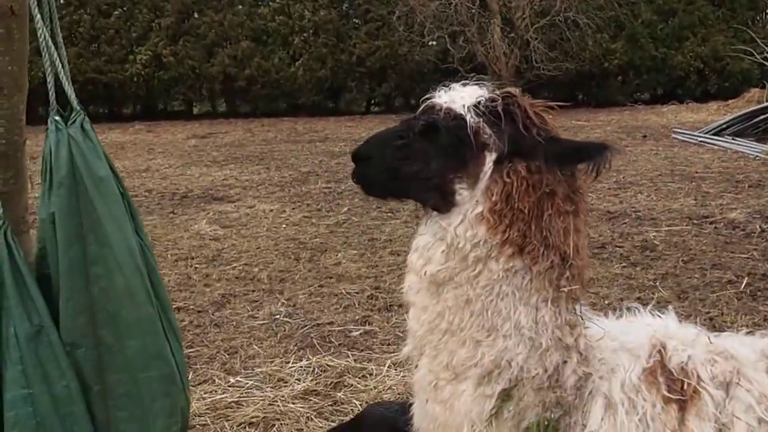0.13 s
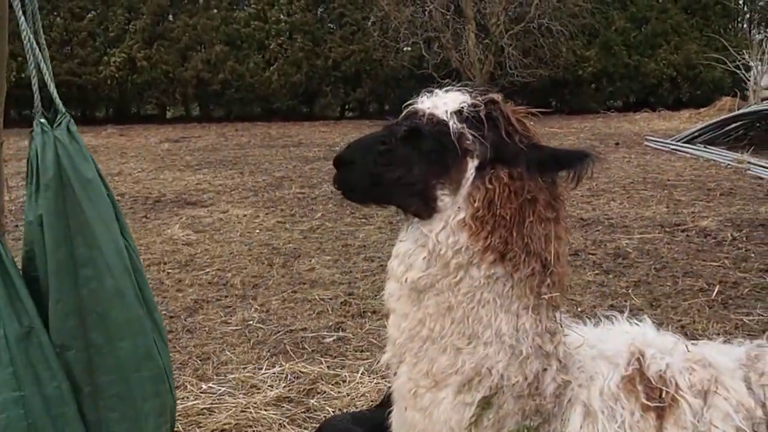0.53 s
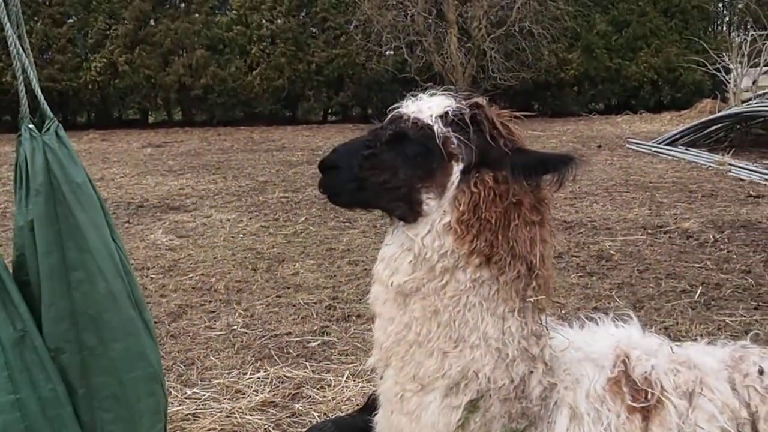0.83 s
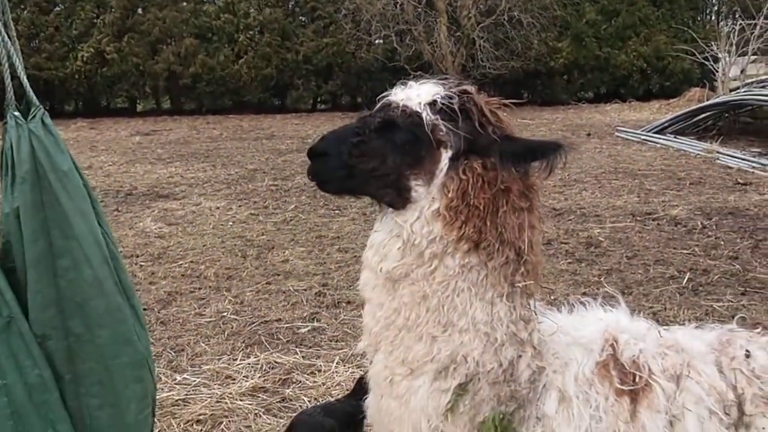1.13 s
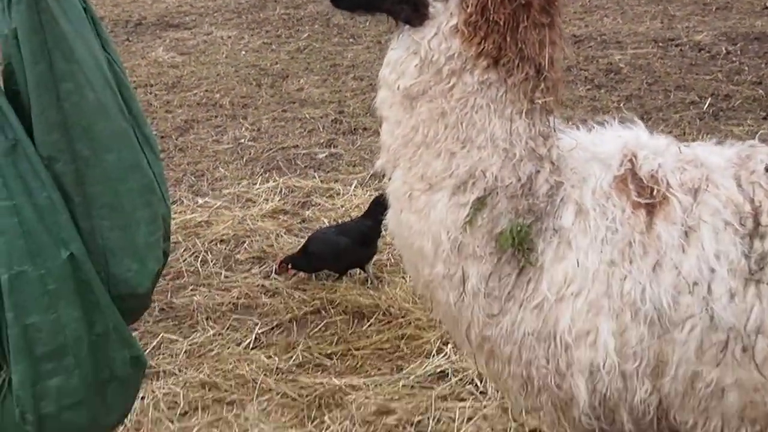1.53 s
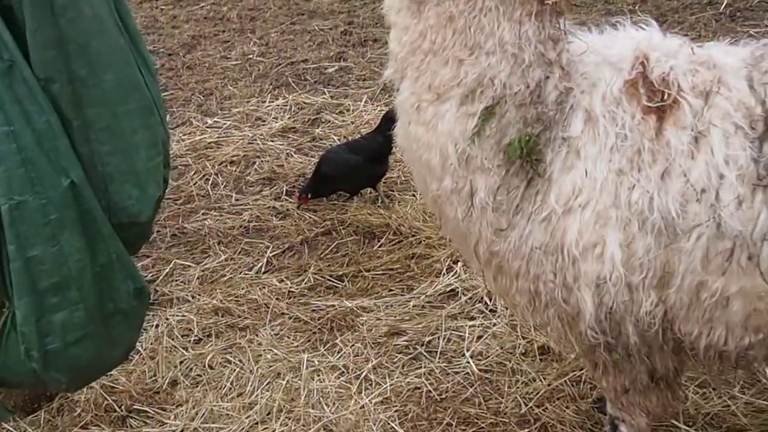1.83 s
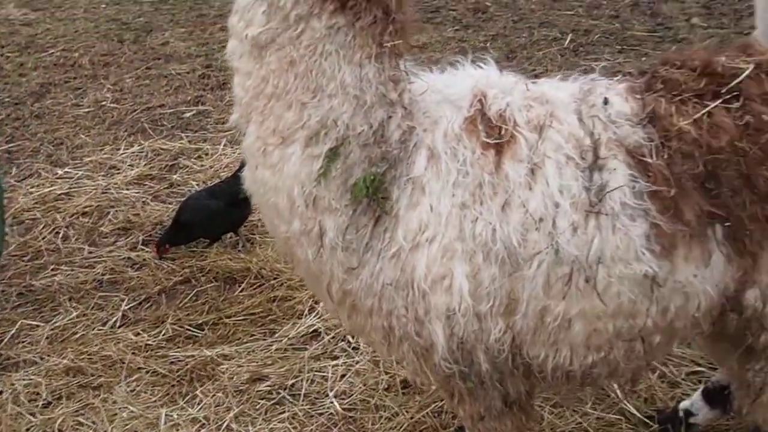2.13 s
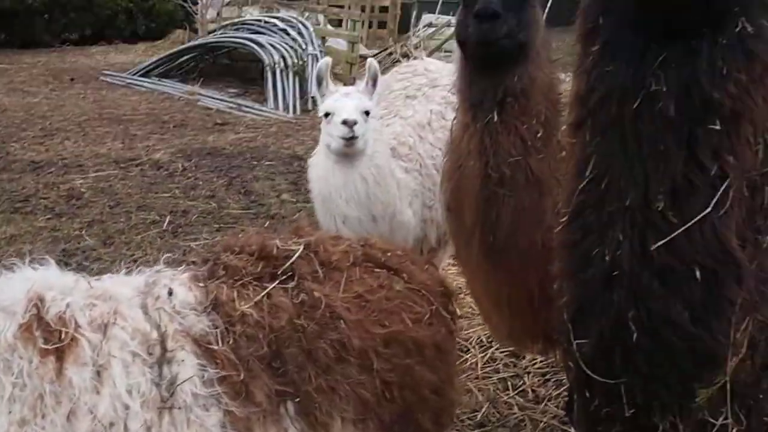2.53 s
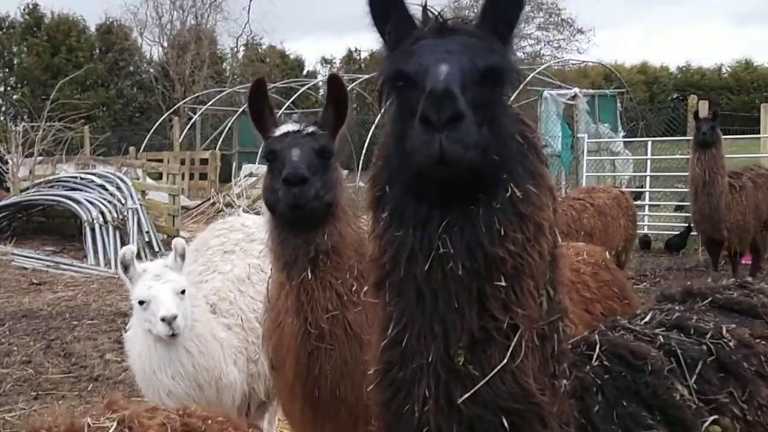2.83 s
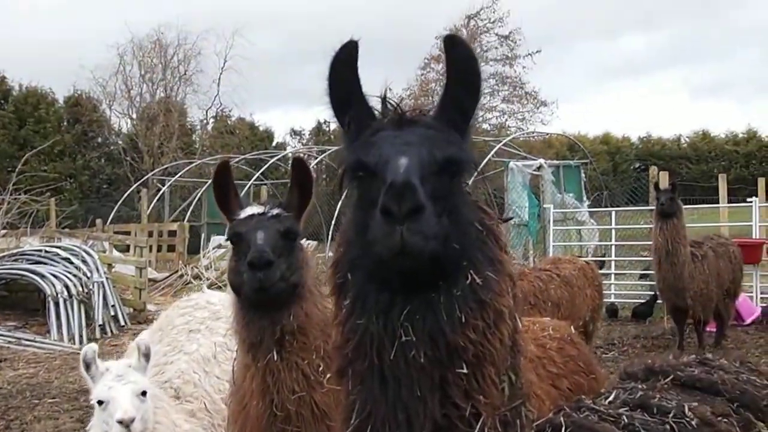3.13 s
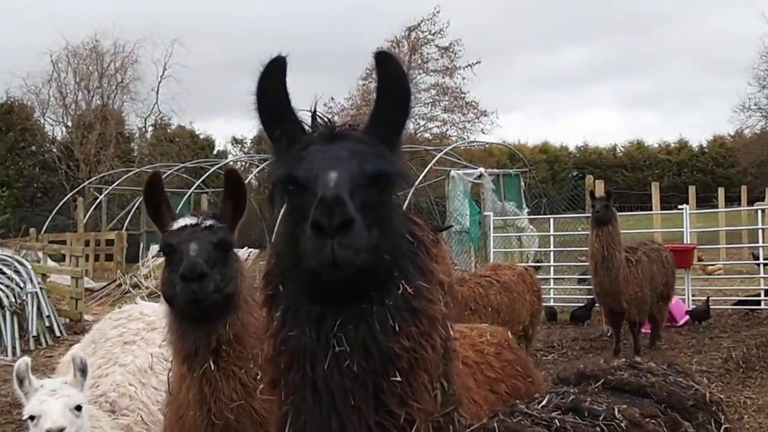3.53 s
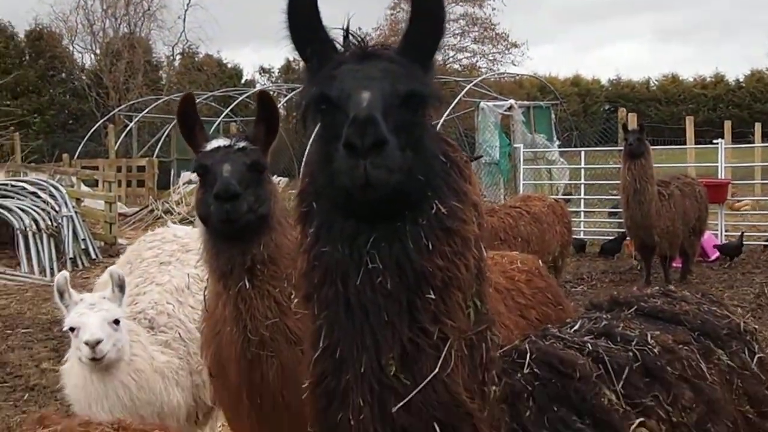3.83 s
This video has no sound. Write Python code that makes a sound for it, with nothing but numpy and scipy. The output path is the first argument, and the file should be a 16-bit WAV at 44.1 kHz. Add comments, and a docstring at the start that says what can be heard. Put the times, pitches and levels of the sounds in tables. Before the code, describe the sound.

One hoarse rooster crow rings across a paddock from about one to three seconds, cracking at its end. Low wind buffets hit the microphone before and during it, then a close click and soft clucks.

```python
"""In a farmyard a rooster crows once: two short notes, a third, and a long sinking one.
Hoarse pulses and a clear tone ring through throat resonances and echo around the yard.
Shaped noise makes the wind that buffets the microphone, and short swinging tones make its thumps.
Sliding tones make a small bird and hens, faint behind; short ringing snaps make clicks close by."""
import sys
import numpy as np
from scipy import signal
from scipy.fft import rfft, irfft
from scipy.io import wavfile
from scipy.ndimage import uniform_filter1d

SR = 44100
rng = np.random.default_rng(int(sys.argv[2]) if len(sys.argv) > 2 else 0)


def unload_audio(sound):
    """Save the sound as a 16-bit wav file, at the path given as the first command line argument."""
    columns = np.transpose(np.atleast_2d(sound))
    # keep every value between -1 and 1, then stretch to whole-number steps
    steps = np.round(np.clip(columns, -1, 1) * 32767)
    wavfile.write(sys.argv[1], SR, steps.astype(np.int16))


N = 176400
T = np.arange(N) / SR


def amp(db):
    """Turns decibels into gain."""
    return 10 ** (np.asarray(db) / 20)


def unit(x):
    """Scales a sound to an rms level of 1."""
    return x / np.sqrt(np.mean(x ** 2) + 1e-20)


def curve(points):
    """Joins (seconds, value) points with straight lines over the whole scene."""
    return np.interp(T, *np.transpose(points))


def read(points, hz):
    """Reads (Hz, value) points along a logarithmic frequency axis."""
    point_hz, value = np.transpose(points)
    return np.interp(np.log(hz + 1), np.log(point_hz), value)


def add(mix, start_s, sound):
    """Mixes a sound in at a given time."""
    part = mix[max(round(start_s * SR), 0):][:len(sound)]
    part += sound[:len(part)]


def noise(spectrum):
    """Random noise coloured by a spectrum, at an rms level of 1."""
    gain = amp(read(spectrum, np.fft.rfftfreq(N, 1 / SR)))
    return unit(irfft(rfft(rng.standard_normal(N)) * gain, N))


def wander(rate_hz):
    """Random drift, mostly slower than the given rate, at an rms level of 1."""
    slowing = 1 + (np.fft.rfftfreq(N, 1 / SR) / rate_hz) ** 4
    return unit(irfft(rfft(rng.standard_normal(N)) / slowing, N))


def steady(x, size):
    """Evens out the running level to 1; size is the averaging length in samples."""
    power = uniform_filter1d(uniform_filter1d(x ** 2, size), size)
    return x / np.sqrt(abs(power) + 1e-12)


def glides(rows, arch=0, rough=0):
    """Short soft-edged tones that slide in pitch, optionally arched or rough."""
    out = np.zeros(N)
    for start_s, length_s, hz, glide, db in rows:
        u = np.linspace(-.5, .5, int(length_s * SR))
        pitch_hz = hz * (1 + glide * u - arch * u * u + rough * wander(292)[:len(u)])
        tone = np.sin(2 * np.pi * np.cumsum(pitch_hz) / SR)
        add(out, start_s, amp(db) * np.cos(np.pi * u) * tone)
    return out


# Colour of the faint open-air hiss. Each row: frequency in Hz, relative level in dB.
HISS_SPECTRUM = [(100, -3.5), (300, 0.5), (750, -1), (3000, -20), (7500, -27.5), (10500, -38),
                 (15500, -31.5)]


def open_air(level_db=-41):
    """Distant hiss of the fields: steady noise, strongest in the low range."""
    return amp(level_db) * noise(HISS_SPECTRUM)


# Wind buffets. Each row: centre in seconds, time to fade to about a third in seconds, level in dB.
BUFFETS = [(0.563, 0.034, -21), (1.309, 0.047, -22.5), (1.395, 0.03, -22.5), (1.524, 0.085, -24.5),
           (2.393, 0.02, -17), (2.53, 0.038, -15), (2.652, 0.081, -14.5), (2.875, 0.057, -14.5),
           (3.014, 0.067, -15.5), (3.17, 0.017, -18)]
# Colour of gentle wind. Each row: frequency in Hz, relative level in dB.
GENTLE_WIND = [(15, -6.5), (75, 3.5), (150, -6.5), (400, -32.5), (3000, -70)]
# Colour of strong wind. Each row: frequency in Hz, relative level in dB.
STRONG_WIND = [(15, -32), (100, 2), (270, -4), (600, -22), (3000, -67)]
# Rumble under the buffets, before its random drift. Each row: time in seconds, level in dB.
RUMBLE_LEVEL = [(.9, -36), (1.3, -25.5), (1.8, -39.5), (3.2, -28.5), (3.55, -32)]


def wind(hard_db=-12):
    """Turbulent air on the microphone makes noise; the stronger buffets reach higher."""
    force_squared = sum(amp(db) ** 2 * np.exp(-2 * ((T - s) / half) ** 2) for s, half, db in BUFFETS)
    force = np.sqrt(force_squared)
    hard = np.clip(force / amp(hard_db), 0, 1) ** 2  # share of the strong colour
    blend = np.sqrt(1 - hard) * noise(GENTLE_WIND) + np.sqrt(hard) * noise(STRONG_WIND)
    buffets = force * steady(blend, size=900)
    rumble_db = curve(RUMBLE_LEVEL) + 4.3 * wander(5.6)
    return buffets + amp(rumble_db) * steady(noise(GENTLE_WIND), size=3000)


# Wind thumps. Each row: centre in seconds, peak level in dB, approximate frequency in Hz.
WIND_THUMPS = [(0.468, -7, 90.1), (.55, -16, 150.2), (.762, -20.5, 168), (0.805, -18, 164.6),
               (.885, -19, 150.5), (1.058, -23, 170), (2.392, -11, 125), (2.584, -5, 174.7),
               (2.672, -8, 200), (2.694, -7.5, 329.2), (2.73, -5, 250), (2.754, -10, 261),
               (2.897, -7, 237.9), (3.065, -9.5, 229.3)]
THUMP_CYCLES, THUMP_SKEW = .7, .7  # spread in swings, steepness of the fronts in radians


def thumps():
    """Single eddies slap the microphone: a few uneven, steep-fronted swings of pressure each."""
    out = np.zeros(N)
    uneven_s = np.cumsum(np.exp(.25 * wander(90))) / SR  # a clock that runs unevenly
    for centre_s, db, hz in WIND_THUMPS:
        swell = np.exp(1 - np.hypot((T - centre_s) * hz / THUMP_CYCLES, 1))
        phase = 2 * np.pi * (hz * uneven_s + rng.random())
        out += amp(db) * swell * np.sin(phase + THUMP_SKEW * swell * np.sin(phase))
    return out


# Throat resonances. Each row: frequency in Hz before neck and wobble, width in Hz,
# then the level in dB in the opening note, in full cry and in the closing note.
RESONANCES = [(659.4, 80, -4.5, -0.5, 3), (1113, 320, -8, -7.5, -5), (1631, 220, 0, -2.5, 0),
              (2089, 278, -6.5, -2.5, -4), (3086, 184, -29.5, -9, -18.5), (4170, 600, -23, -45, -15),
              (5170, 365, -18, -27, -11.5), (6196, 470, -27, -31.5, -14), (7270, 610, -50, -30.5, -30.5),
              (8145, 300, -32, -32, -19.5), (8980, 160, -34, -35, -27), (12000, 4600, -43.5, -42.5, -35)]
# Passage from opening note (0) through full cry (1) to closing note (2).
# Each row: time in seconds, stage as a plain number.
CRY_STAGE = [(1.28, 0.082), (1.37, 0.96), (1.95, 1.03), (2.45, 1.81)]
# The resonances sink as the neck relaxes. Each row: time in seconds, factor on the frequency.
NECK_FACTOR = [(1.15, 0.96), (1.45, 0.98), (1.88, 0.992), (2.1, 0.944), (3.2, 0.92)]
NECK_TOP_HZ, WOBBLE = 3500, .016  # only lower resonances follow the neck; wobble as a share
SWELL_S, SWELL_LENGTH_S, SWELL_DB = 2.478, 0.1, 6.5  # the ring near 5 kHz swells in the long note


def throat(x):
    """Steep throat resonances that wobble, sink and change weight along the crow."""
    neck, stage, out = curve(NECK_FACTOR), curve(CRY_STAGE), 0
    swell_db = SWELL_DB * np.exp(-((T - SWELL_S) / SWELL_LENGTH_S) ** 2)
    for k, (hz, width_hz, *stages_db) in enumerate(RESONANCES):
        factor = (neck if hz < NECK_TOP_HZ else 1) + WOBBLE * wander(10)
        spin = np.exp(2j * np.pi * hz * np.cumsum(factor) / SR)
        # shift the resonance down to 0 Hz, smooth three times, shift back up
        r = np.exp(-np.pi * width_hz * 2 / SR)
        ring = signal.lfilter([(1 - r) ** 3], np.poly([r, r, r]), x / spin)
        level_db = np.interp(stage, np.arange(len(stages_db)), stages_db)
        level_db = level_db + swell_db * (4700 < hz < 5800)
        out = out + amp(level_db) * (spin * ring * (-1) ** k).real
    return out


# Pitch of the crow, before its random unsteadiness. Each row: time in seconds, pitch in Hz.
CROW_PITCH = [(1.08, 543.6), (1.135, 652), (1.165, 779), (1.22, 620), (1.38, 754.3), (1.415, 855.6),
              (1.45, 839.4), (1.505, 692.6), (1.65, 821.7), (1.8, 859.6), (1.9, 793.6), (2.15, 771.3),
              (2.79, 777), (3.14, 705), (3.22, 637)]
# Hoarse voice, before the shared flutter. Each row: time in seconds, level in dB.
HOARSE_LEVEL = [(1.06, -101), (1.08, -32), (1.13, -25), (1.19, -25), (1.225, -30.5), (1.26, -44),
                (1.372, -79), (1.39, -22.5), (1.455, -32), (1.495, -26.5), (1.54, -33), (1.6, -25.5),
                (1.82, -23), (1.89, -32), (1.98, -25), (2.24, -23.5), (2.52, -31), (2.76, -41),
                (2.9, -33.5), (3.16, -38.5), (3.28, -43)]
# Clear voice, before the shared flutter. Each row: time in seconds, level in dB.
CLEAR_LEVEL = [(1.08, -52), (1.135, -32), (1.165, -20), (1.23, -72), (1.38, -55), (1.41, -23),
               (1.47, -16.5), (1.51, -51), (1.595, -27), (1.625, -20), (1.67, -34.5), (1.8, -35),
               (1.88, -54), (2.24, -36.5), (2.7, -60), (2.8, -32.5), (2.88, -43), (3.04, -39.5),
               (3.13, -28.5), (3.24, -53)]
# Clear tone before the throat. Each entry: level in dB of one harmonic, from the fundamental up;
# ten higher ones stay at the last level.
CLEAR_HARMONICS = [-9, -0.5, -4.5, -1, -4.5]
# timing spread of the pulses and of the clear tone, strength spread of the pulses, breath level
JITTER, CLEAR_JITTER, SHIMMER, AIR = .07, .005, .4, .45
# rasp: timing spread, strength spread, share of the hoarse power, weakening of every other beat
RASP_JITTER, RASP_SHIMMER, RASP_SHARE, RASP_HALVES = .028, .22, .55, .45
# a brief throb of the clear tone at a third of its pitch
THIRDS_S, THIRDS_LENGTH_S, THIRDS_DEPTH = 1.425, 0.024, 0.89
FLUTTER_DB = 1.7  # typical unsteadiness of loudness


def rooster():
    """Chaotic pulses, a rasp on every third cycle and a clear tone share one pitch and one throat."""
    hz = curve(CROW_PITCH)

    ragged = np.cumsum(hz * (1 + JITTER * wander(220))) / SR
    pulses = np.diff(np.floor(ragged), prepend=0) * np.exp(SHIMMER * wander(200))
    puffs = np.exp(-(ragged % 1) / 2.2) * rng.standard_normal(N)  # breath fades within each cycle
    chaos = unit(unit(pulses - pulses.mean()) + AIR * unit(puffs))

    beats = np.floor(np.cumsum(hz / 3 * (1 + RASP_JITTER * wander(45))) / SR)
    rasp = np.diff(beats, prepend=0) * np.exp(RASP_SHIMMER * wander(91))
    rasp = rasp * (1 - RASP_HALVES * (beats % 2))
    hoarse = np.sqrt(1 - RASP_SHARE) * chaos + np.sqrt(RASP_SHARE) * unit(rasp)

    drift = CLEAR_JITTER * np.maximum(curve(CRY_STAGE), 1) * wander(73.2)
    turns = np.cumsum(hz * (1 + drift)) / SR
    levels_db = CLEAR_HARMONICS + CLEAR_HARMONICS[-1:] * 10
    clear = sum(amp(db) * np.cos(2 * np.pi * k * turns) for k, db in enumerate(levels_db, 1))
    throb = THIRDS_DEPTH * np.exp(-((T - THIRDS_S) / THIRDS_LENGTH_S) ** 2)
    clear = clear * (1 + throb * np.cos(2 * np.pi * turns / 3))

    low_cut = signal.butter(4, 500, "high", fs=SR, output="sos")
    hoarse, clear = signal.sosfilt(low_cut, throat(np.array([hoarse, clear])))
    voice = steady(hoarse, size=900) * amp(curve(HOARSE_LEVEL))
    voice = voice + steady(clear, size=900) * amp(curve(CLEAR_LEVEL))
    fade_out = np.clip((HOARSE_LEVEL[-1][0] - T) / 0.053, 0, 1)
    return voice * amp(FLUTTER_DB * wander(29)) * (T > HOARSE_LEVEL[0][0]) * fade_out


# First reflections from the ground and the pens. Each row: delay in seconds, gain as a factor.
FIRST_REFLECTIONS = [(.0047, 0.11), (0.0102, 0.4), (.023, .2)]


def reflected(x):
    """Adds the first reflections: delayed, weaker copies of the sound."""
    out = x.copy()
    for delay_s, gain in FIRST_REFLECTIONS:
        add(out, delay_s, gain * x)
    return out


# How long the echo rings. Each row: frequency in Hz, time to fade by 60 dB in seconds.
ECHO_FADE = [(4000, .85), (12000, 0.32)]


def yard_echo(x, wet_db=-12, rise_s=0.021):
    """Scattered reflections from sheds and hedges: a noise tail whose treble fades sooner."""
    hz, t, cells = signal.stft(rng.standard_normal(SR), SR, nperseg=256)
    fade_db = -60 * t / read(ECHO_FADE, hz)[:, None]
    tail = signal.istft(cells * amp(fade_db), SR)[1]
    tail = tail * np.minimum(np.arange(len(tail)) / SR / rise_s, 1) ** 2
    return amp(wet_db) * signal.fftconvolve(x, tail / np.linalg.norm(tail))[:N]


# The bird's one whistle, a single row: start in seconds, length in seconds, pitch in Hz,
# glide as a share of the pitch, level in dB.
WHISTLE = (2.151, .165, 3975, .07, -46)


def small_bird():
    """A faint whistle whose pitch arches up and over."""
    return glides([WHISTLE], arch=0.4)


# Clicks. Each row: start in seconds, peak level in dB.
CLICK_TIMES = [(2.5395, -23.5), (3.3538, -12.5)]
# Tones inside a click. Each row: frequency in Hz, relative level in dB,
# time to fade by 60 dB in seconds.
CLICK_TONES = [(3513, 3, 0.0044), (5980, 1, 0.0027), (8900, -15, 0.0063)]


def clicks(rise_s=0.00047):
    """Tiny dry snaps close by: fast-fading high tones with a burst of noise."""
    out, t = np.zeros(N), np.arange(0, .02, 1 / SR)
    ring = sum(amp(db - 60 * t / t60) * np.sin(2 * np.pi * hz * t) for hz, db, t60 in CLICK_TONES)
    burst = 0.56 * np.exp(-t / 0.0012) * rng.standard_normal(len(t))
    snap = (ring + burst) * np.minimum(t / rise_s, 1)
    for start_s, db in CLICK_TIMES:
        add(out, start_s, amp(db) * snap / abs(snap).max())
    return out


# Squeals in the crow. Each row: start in seconds, length in seconds, middle pitch in Hz,
# glide as a share of the pitch, level in dB.
CROW_SQUEALS = [(3.085, .1, 2750, -.33, -41), (3.16, .07, 3470, -.1, -46)]


def squeals():
    """The crow cracks into rough, falling squeals."""
    return glides(CROW_SQUEALS, rough=0.032)


# Hen clucks. Each row: start in seconds, length in seconds, middle pitch in Hz,
# glide as a share of the pitch, level in dB.
HEN_CLUCKS = [(3.547, 0.034, 258, 0.13, -29.5), (3.683, 0.057, 540, -0.24, -34.5)]


def hens():
    """Soft clucks: very short low tones that slide up or down."""
    return glides(HEN_CLUCKS)


def scene():
    """The farmyard in mono."""
    crow = reflected(rooster() + squeals())
    birds = hens() + small_bird()
    return (crow + yard_echo(crow) + wind() + thumps() + open_air() + clicks() + birds)[None]


CEILING, RECOVER_DB_PER_S = 0.47, 6  # limiter threshold (full scale is 1) and recovery speed
EDGE_HZ = 15800  # top of the band


def record(dry):
    """A limiter ducks on peaks over its ceiling and recovers slowly; then the top is cut off."""
    over_db = np.maximum(20 * np.log10(abs(dry[0]) / CEILING + 1e-9), 0)
    fall_db = T * RECOVER_DB_PER_S
    duck_db = np.maximum.accumulate(over_db + fall_db) - fall_db
    duck_db = uniform_filter1d(duck_db, size=40)
    low_pass = signal.firwin(511, EDGE_HZ, window=("kaiser", 9), fs=SR)
    return signal.oaconvolve(dry * amp(-duck_db), low_pass[None], "same")


dry = scene()
out = record(dry)
unload_audio(out)
```